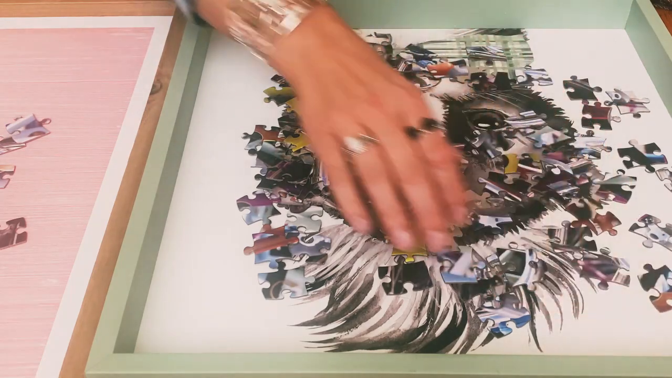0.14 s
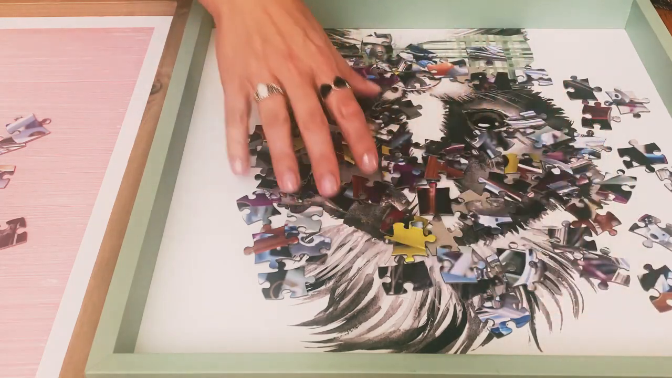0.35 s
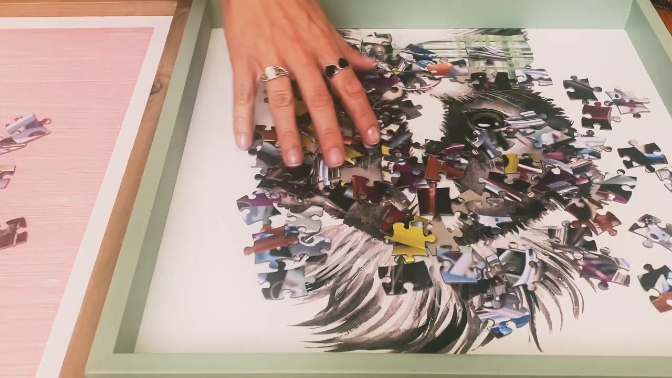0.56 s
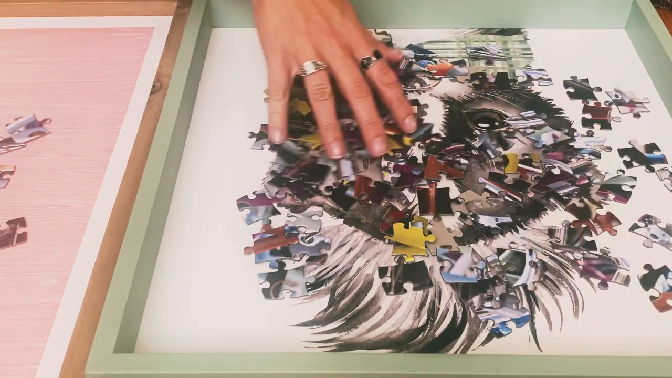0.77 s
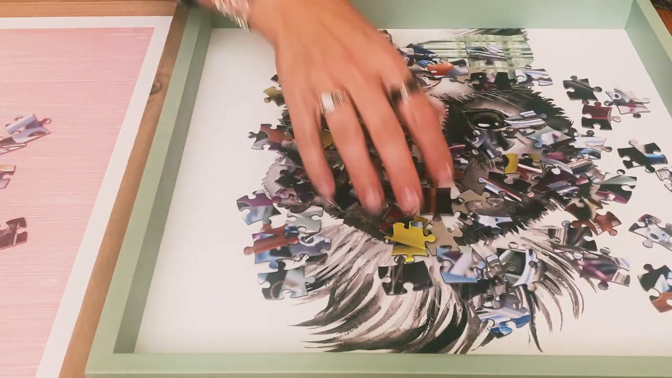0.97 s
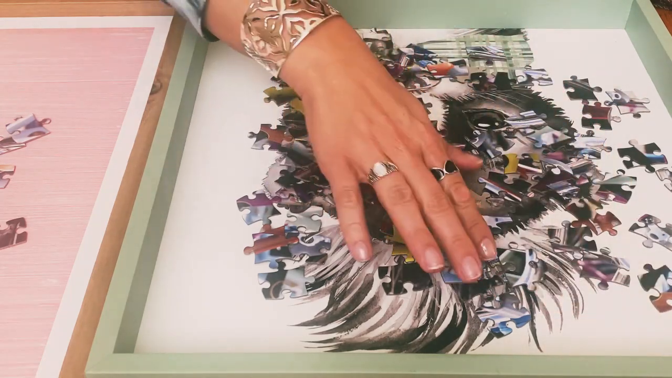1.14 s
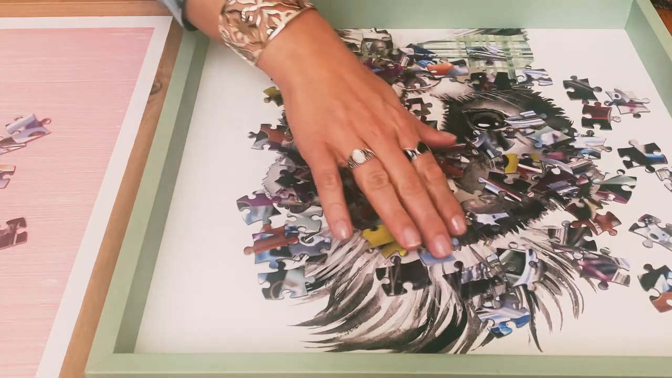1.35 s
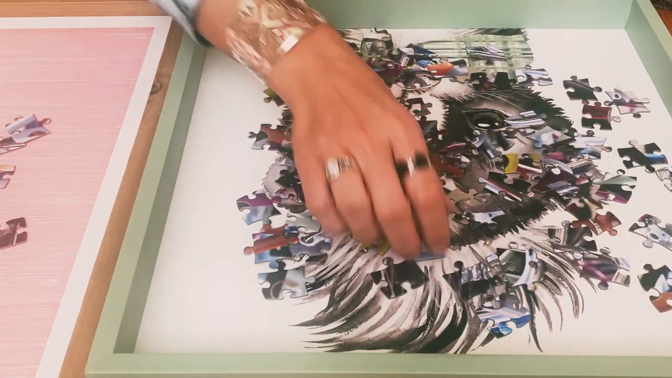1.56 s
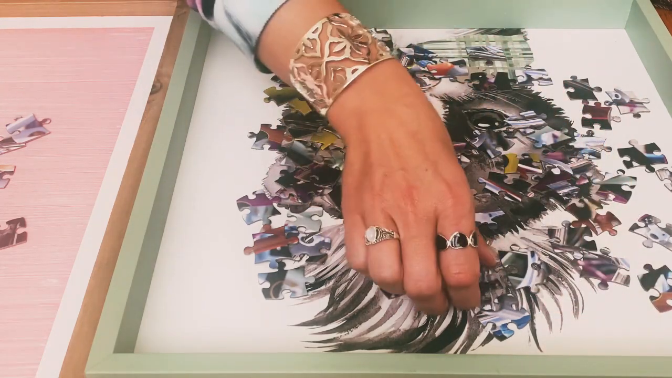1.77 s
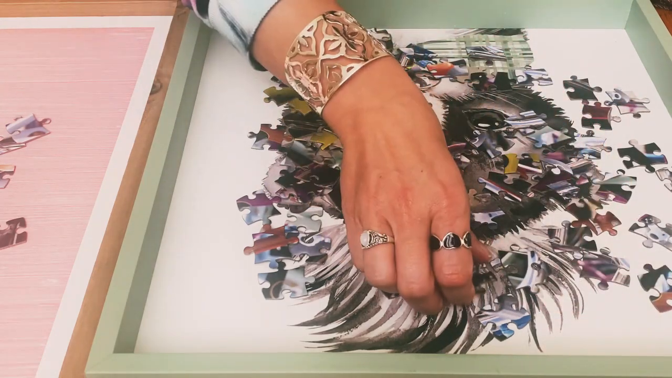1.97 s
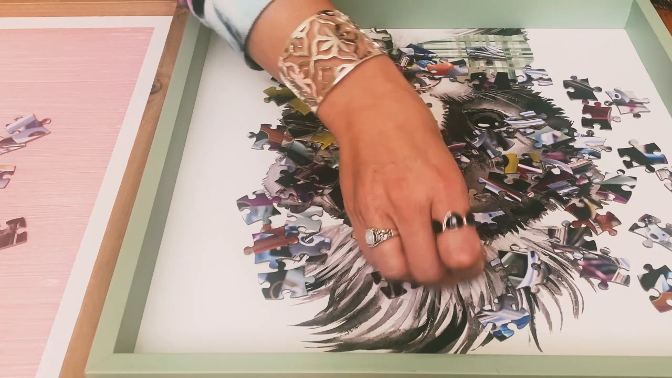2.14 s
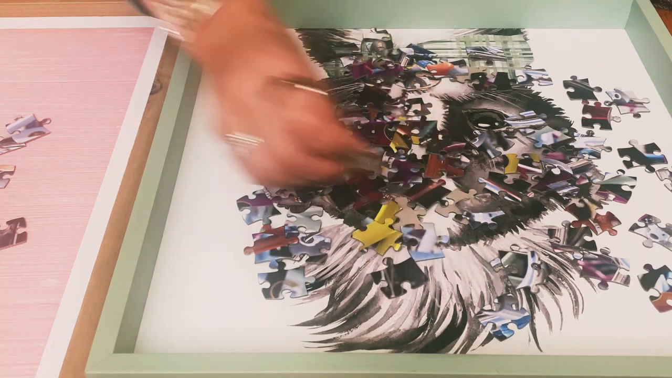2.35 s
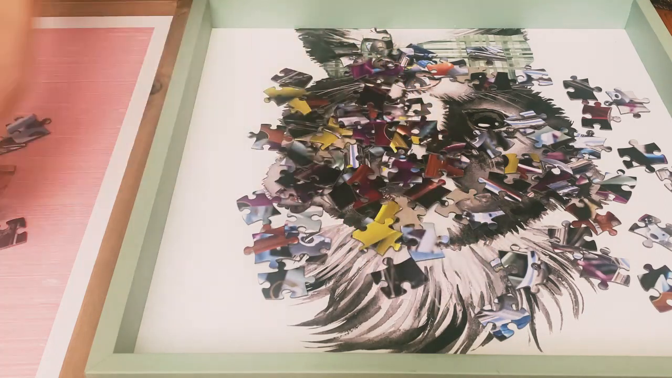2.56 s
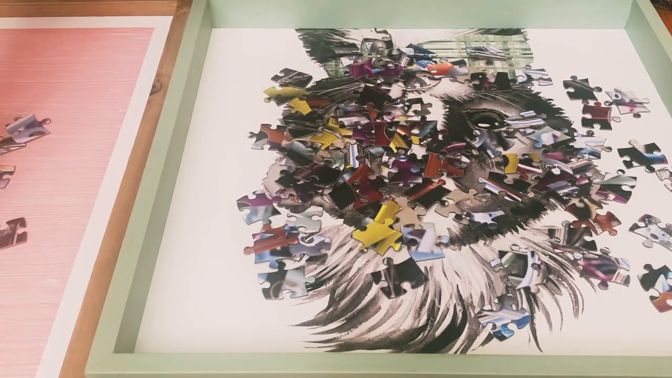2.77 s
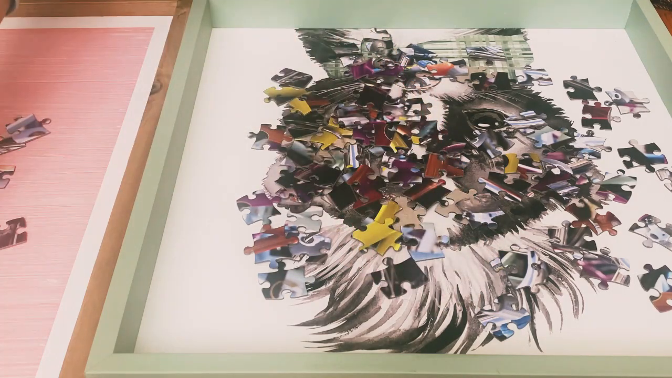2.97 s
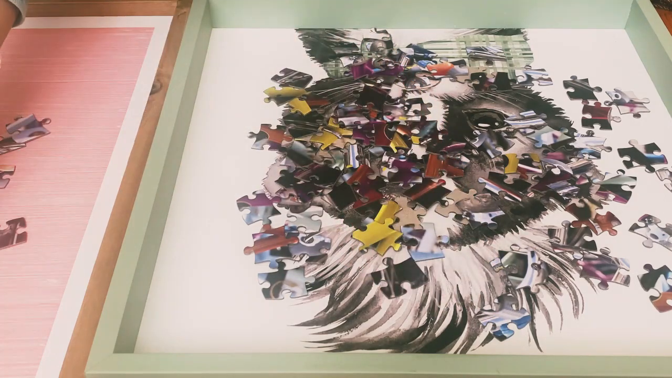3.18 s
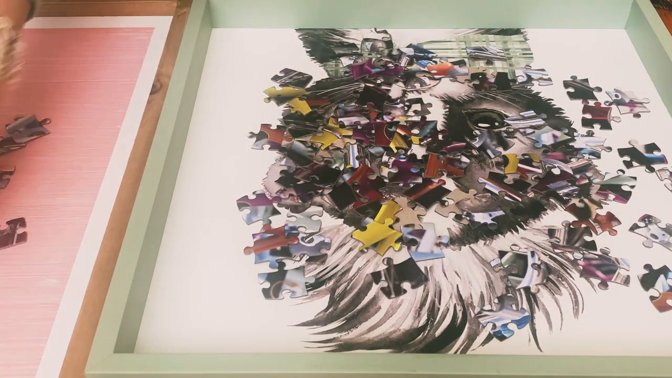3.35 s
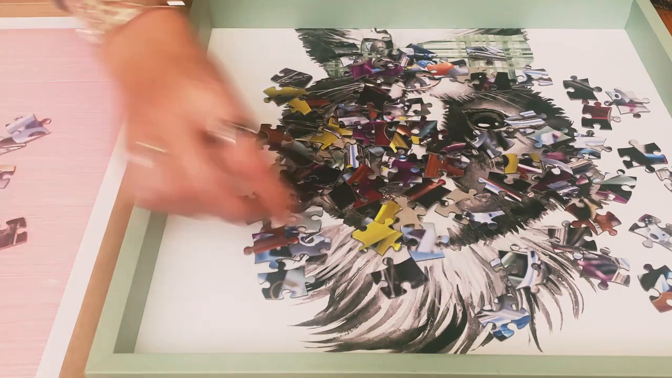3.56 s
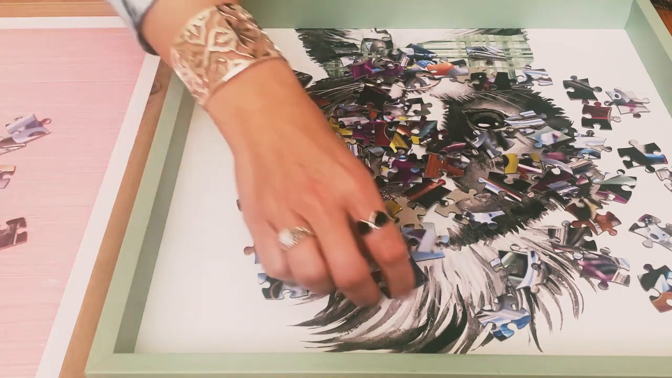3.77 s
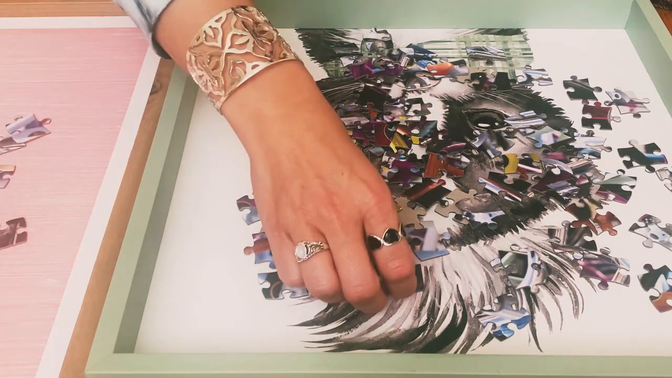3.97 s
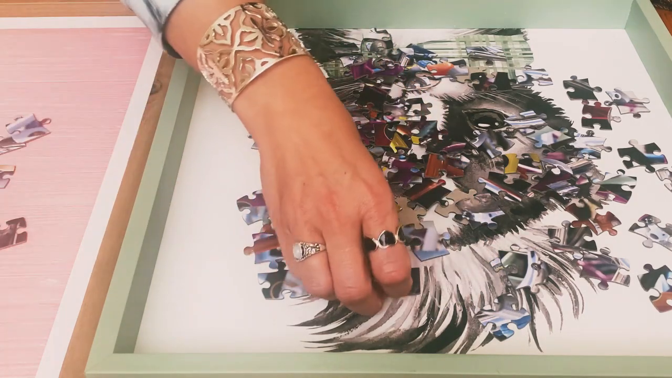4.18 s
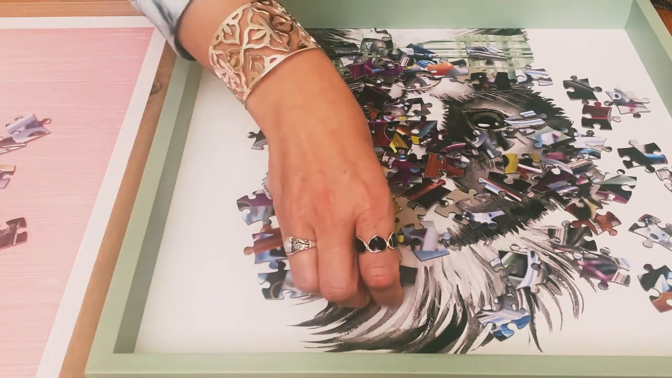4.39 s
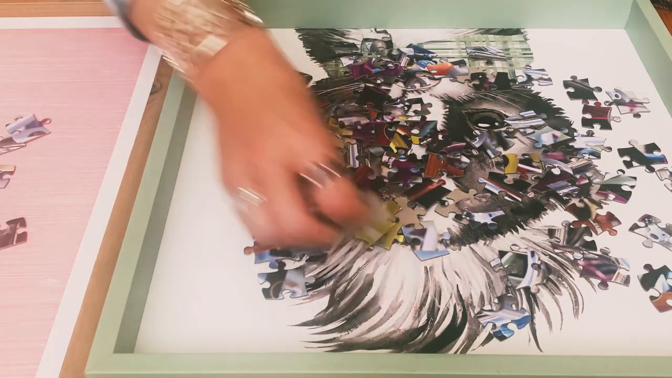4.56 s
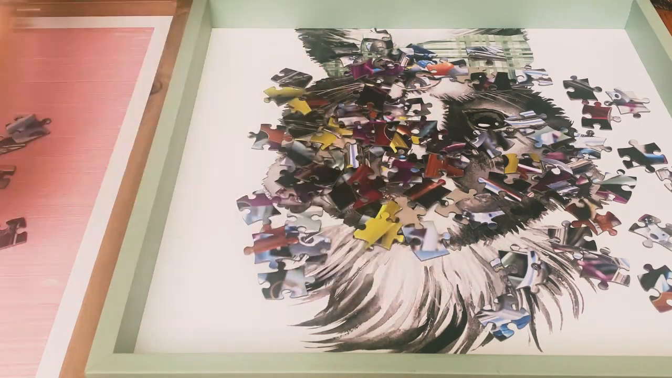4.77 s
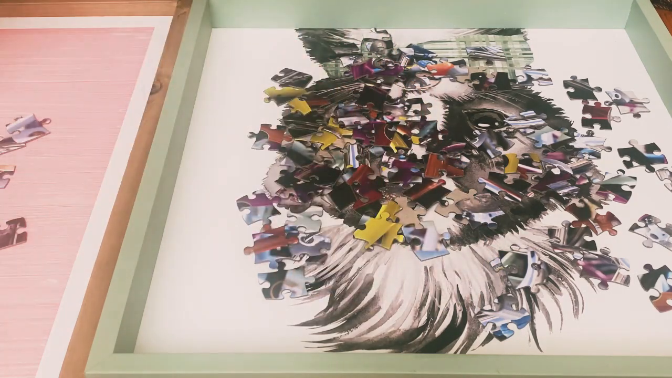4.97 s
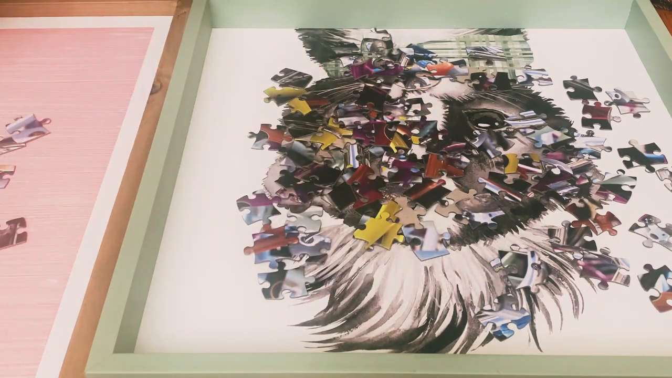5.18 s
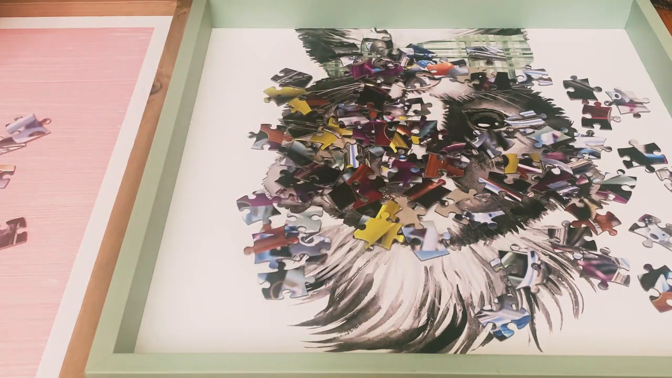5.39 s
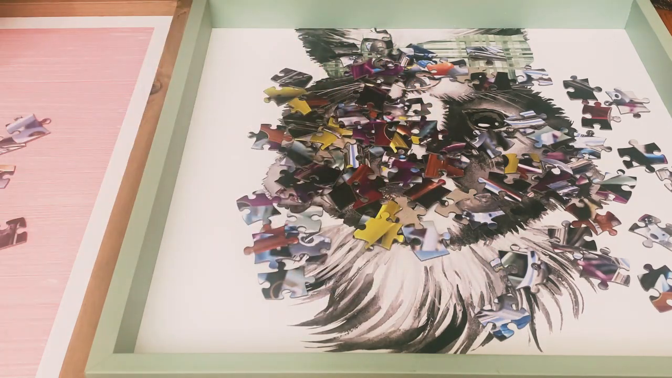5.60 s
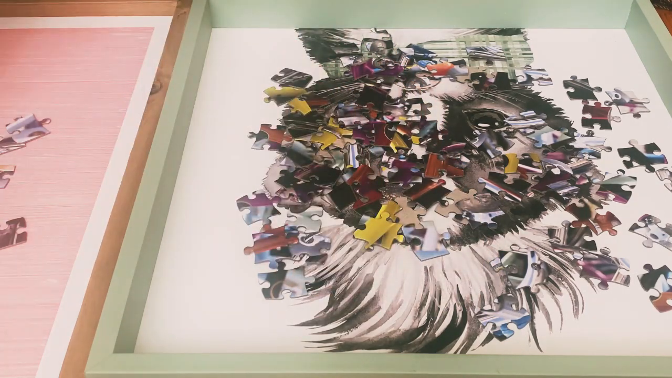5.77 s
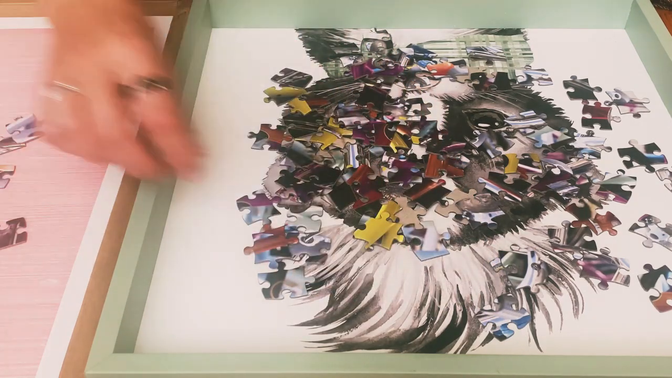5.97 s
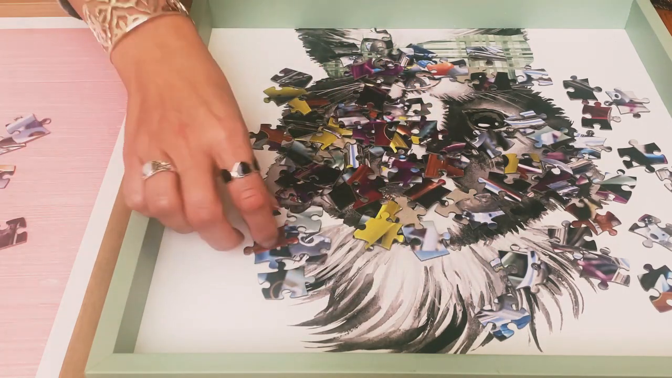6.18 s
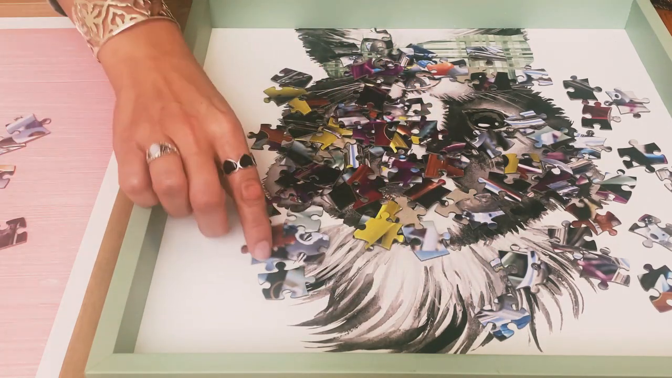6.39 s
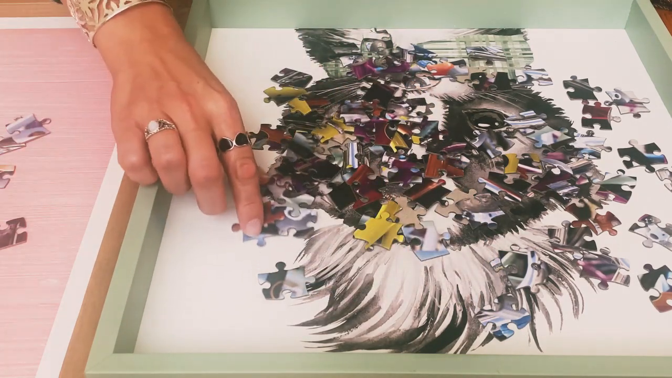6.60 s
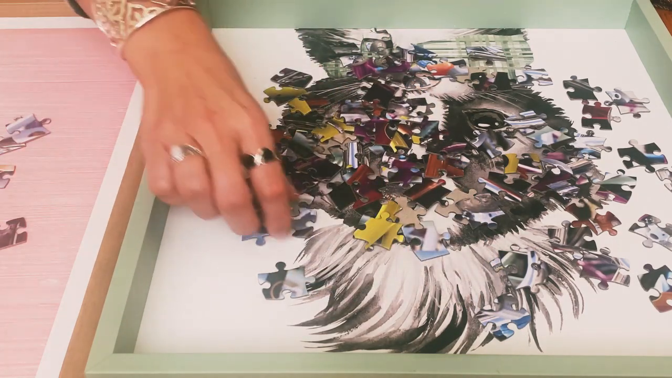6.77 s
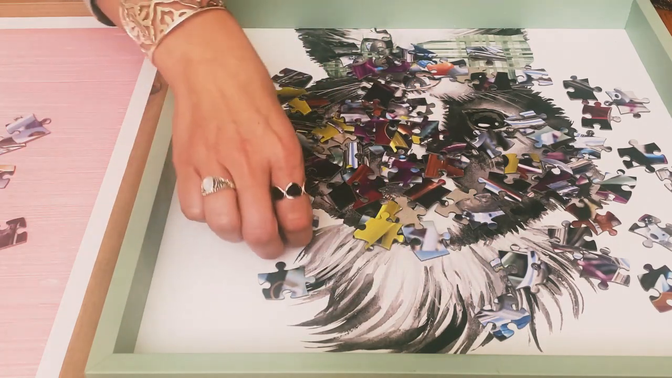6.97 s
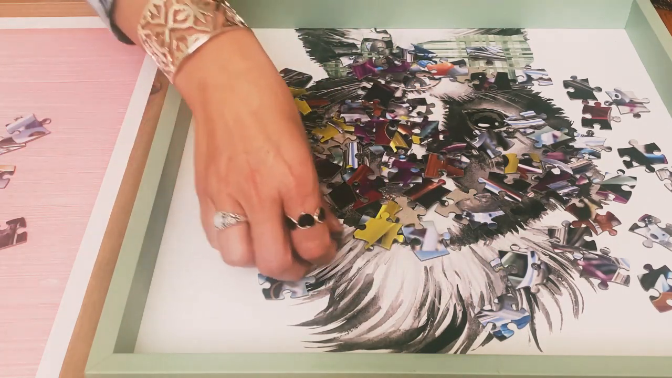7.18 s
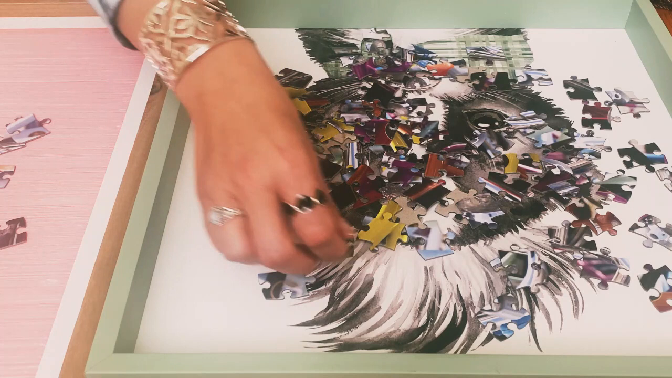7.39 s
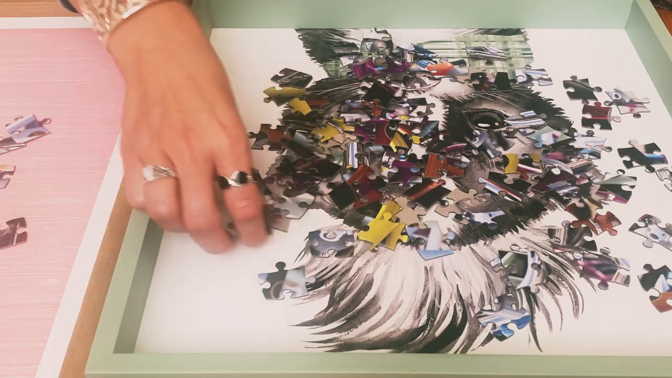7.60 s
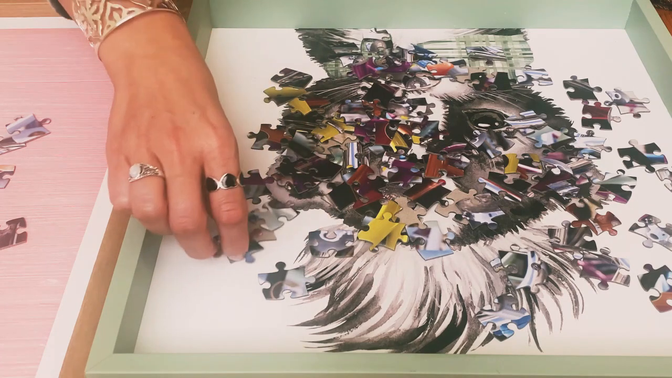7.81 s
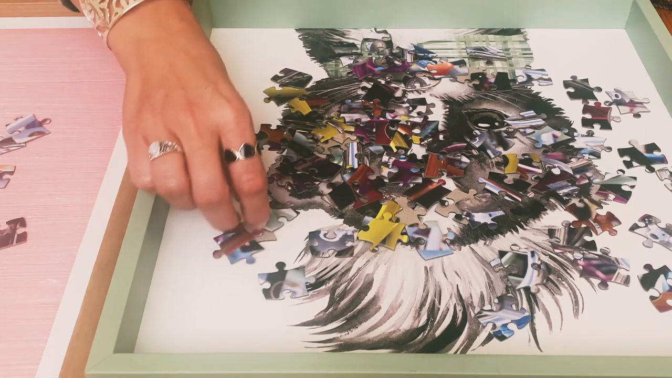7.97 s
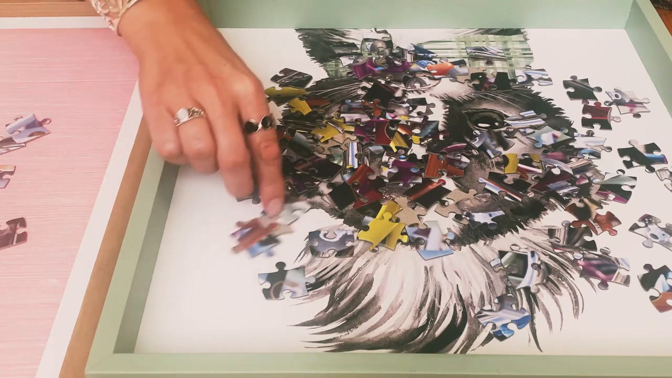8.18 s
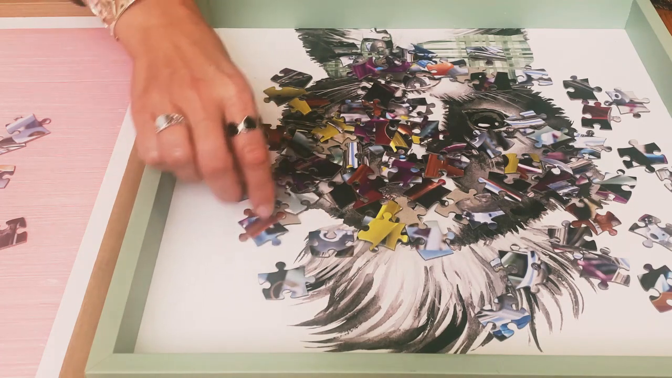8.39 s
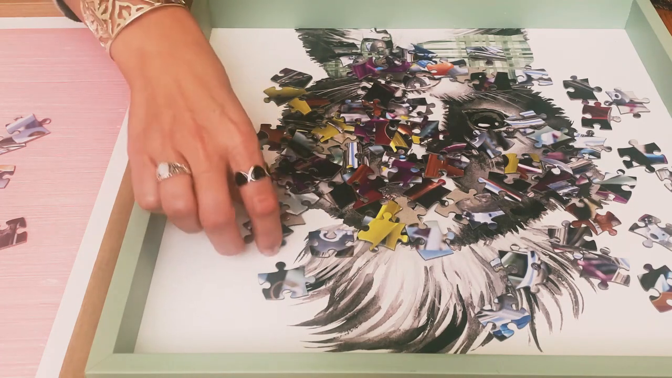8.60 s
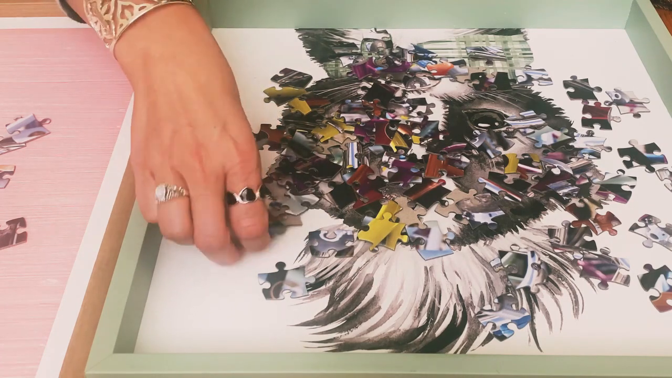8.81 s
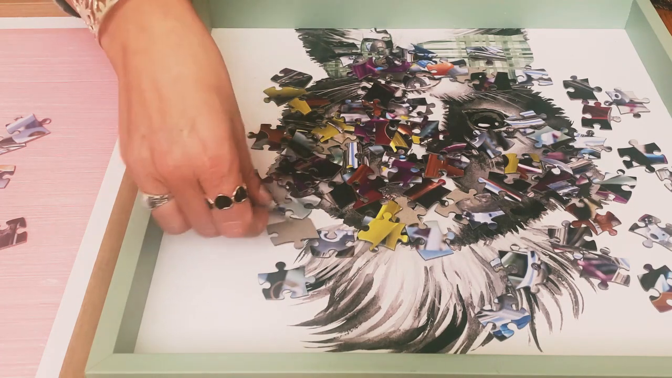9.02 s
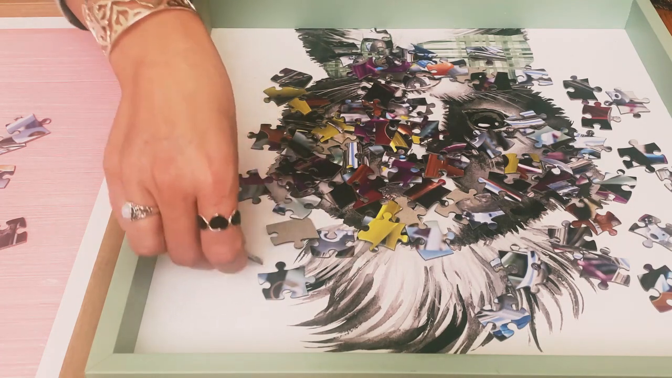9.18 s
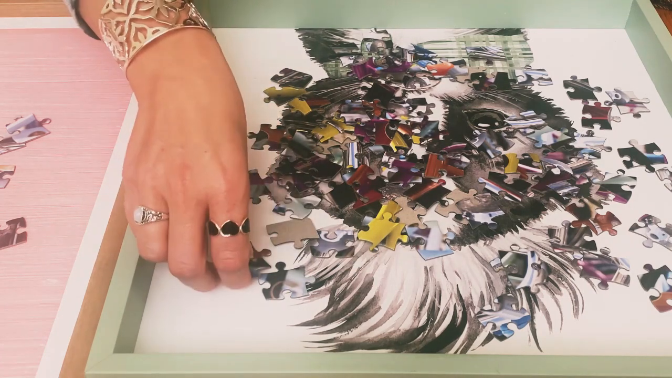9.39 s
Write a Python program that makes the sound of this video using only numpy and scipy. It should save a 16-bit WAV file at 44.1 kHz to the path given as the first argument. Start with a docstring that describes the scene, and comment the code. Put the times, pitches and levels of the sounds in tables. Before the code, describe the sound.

Loose cardboard jigsaw pieces are handled in a tray, heard closely in stereo in a small, live room with faint air, a weak steady mains hum and a deep rumble that swells and sinks. Around 0.6 s come a soft click, a papery slide and a low fingertip groan; at 1.2-1.4 s more clicks end in a firm knock, with a dull thump at 1.7 s. Faint scrapes and tiny high squeaks follow at 2.1-2.3 and 3.0 s, a tap at 3.2 s, then muted thuds and scuffs at 3.8-4.5 s. After a pause, a hollow click lands at 5.55 s. A tiny cuff tinkle at 6.2 s leads to denser rustling: a heavy soft thump at 6.85 s, the sharpest snap at 7.25 s, slides at 7.6 and 8.1 s, a hollow knock at 8.57 s. At 8.9 s a piece flips with rapid bright chatter, then a rasp at 9.2 s and a last soft tap at 9.4 s.

```python
"""Cardboard jigsaw pieces click, slide and rasp as a hand sifts them in a tray in a small, live room.
Clicks are coloured noise bursts with one resonant note; sliding is filtered noise broken into grains.
Fingertips thump the tray, a flipped piece chatters and a cuff tinkles, all as sums of damped modes.
Dragging fingertips make the board groan and edges squeak, both as band-shaped noise.
Beneath lie still air, a sinusoidal mains hum and a rumble of narrow-band noise that swells and sinks."""
import sys
import numpy as np
from scipy import signal
from scipy.fft import rfft, irfft, next_fast_len
from scipy.io import wavfile
from scipy.ndimage import uniform_filter1d

SR = 44100
rng = np.random.default_rng(int(sys.argv[2]) if len(sys.argv) > 2 else 0)


def to_wav(sig):
    """Store sig (one row per channel, or 1-D mono) as 16-bit WAV at the path in sys.argv[1].

    Samples outside -1..1 are clipped; the rate is SR.
    """
    pcm = np.clip(np.atleast_2d(sig), -1, 1) * 32767
    pcm = np.round(pcm).astype(np.int16)
    wavfile.write(sys.argv[1], SR, pcm.T)  # frames by channels


N = 416724

# level of the side signal relative to the common one, setting the stereo width: (f/Hz, level/dB)
STEREO_WIDTH = [(60, -6.5), (140, -2), (250, -2), (500, -5), (1000, -7), (2200, -8), (5000, -3.5)]
# modes of a cardboard piece: (f/Hz, level/dB, t60/s)
PIECE_MODES = [(1683, -2, 0.028), (2300, -2.5, 0.014), (2685, 4, 0.02), (3400, -0.5, 0.018),
               (7750, 6.5, 0.005)]
# rise in level from the ends of a stroke to its middle, where the hand is fastest
SCRAPE_SWELL_DB, HISS_SWELL_DB, GROAN_SWELL_DB = -0.5, 4.5, 0


def amp(db):
    """Level to amplitude: 20 dB is a factor of ten."""
    return 10 ** (np.asarray(db) / 20)


def unit(x):
    """Normalisation to an rms of 1."""
    return x / np.sqrt(np.mean(x ** 2) + 1e-20)


def along(points, hz):
    """Interpolation of (f/Hz, value) points on a logarithmic frequency axis."""
    f, values = np.transpose(points)
    return np.interp(np.log(hz + 1), np.log(f + 1), values)


def curves(rows):
    """Linear interpolation in time: one value per sample for each column after t/s."""
    knot_s, *columns = np.transpose(rows)
    return [np.interp(np.arange(N) / SR, knot_s, column) for column in columns]


def wobble(rate):
    """Random fluctuation: random knots, rate of them a second, joined by lines."""
    knots = rng.standard_normal(int(N * rate / SR) + 2)
    return np.interp(np.arange(N) * rate / SR, np.arange(len(knots)), knots)


def colour(x, points):
    """Minimum-phase filtering: the folded cepstrum of a (f/Hz, level/dB) gain gives a causal response."""
    n = x.shape[-1]
    half = next_fast_len(n // 2 + 2048)
    hz = np.fft.rfftfreq(2 * half, 1 / SR)
    cepstrum = irfft(np.log(amp(along(points, hz))))
    cepstrum[1:half] *= 2
    cepstrum[half + 1:] = 0
    response = np.exp(rfft(cepstrum))
    return irfft(rfft(x, 2 * half) * response)[..., :n]


def spread(mid, side):
    """Sum and difference stereo: an unrelated side signal lowers the coherence of left and right."""
    side = colour(side, STEREO_WIDTH)
    return np.array([mid + side, mid - side])


def noise(points):
    """Spectral shaping: stereo Gaussian noise of rms 1 with (f/Hz, level/dB) as its spectrum."""
    m = next_fast_len(N)
    hz = np.fft.rfftfreq(m, 1 / SR)
    mid_gain = amp(along(points, hz))
    side_gain = mid_gain * amp(along(STEREO_WIDTH, hz))
    spectra = rfft(rng.standard_normal((2, m))) * [mid_gain, side_gain]
    mid, side = irfft(spectra, m)[:, :N]
    return unit(np.array([mid + side, mid - side]))


def levelled(x, seconds):
    """Short-term level: the mean of both sides gets an rms of 1 over its first moments."""
    opening = x.mean(axis=0)[:int(seconds * SR)]
    return x / np.sqrt(np.mean(opening ** 2) + 1e-20)


def add(track, s, x):
    """Linear superposition of x on the track from time s."""
    start = max(round(s * SR), 0)
    part = track[:, start:start + x.shape[1]]
    part += x[:, :part.shape[1]]


def room(x, gap=0.0006, build=0.0049):
    """Diffuse reverberation: a fresh noise tail decays exponentially, at its own rate in each band."""
    # reverberation time: (f/Hz, t60/s)
    reverberation = [(100, 0.62), (260, 0.3), (950, 0.55), (4800, 0.5), (9000, 0.36), (15000, 0.093)]
    # initial spectrum of the tail: (f/Hz, level/dB)
    tail_tone = [(400, 0), (1400, -1.5), (3200, -9), (15000, -3.5)]
    hz, t, z = signal.stft(rng.standard_normal((2, SR // 2)), SR, nperseg=256)
    tone_db = along(tail_tone, hz)[:, None]
    decay = amp(tone_db - 60 * t / along(reverberation, hz)[:, None])
    tail = signal.istft(z * decay, SR, nperseg=256)[1]
    # silence for gap seconds, then a linear build-up
    tail = tail * np.clip((np.arange(tail.shape[1]) / SR - gap) / build, 0, 1)
    tail = spread(*tail) / np.sqrt(SR * 0.027)  # about the energy of the direct sound
    return signal.fftconvolve(x.mean(axis=0)[None], tail, axes=1)


def ring(modes, attack, scatter_db=2.5):
    """Modal synthesis: damped sinusoids of random strength, tuning and phase between the two sides."""
    t = np.arange(SR // 3) / SR
    hz, db, t60 = np.transpose(modes)[:, :, None]
    size, detune, skew, phase = rng.standard_normal((4, len(modes), 1))
    envelope = amp(db + scatter_db * size - 60 * t / t60) * (1 - np.exp(-t / attack))
    angle = 2 * np.pi * (hz * (1 + 0.036 * detune) * t + phase)
    turn = np.arctan(amp(along(STEREO_WIDTH, hz))) * np.sign(skew)
    return np.array([(envelope * np.sin(angle + side * turn)).sum(axis=0) for side in (1, -1)])


def resonate(x, hz, q=16, lift_db=9):
    """Resonance: a second-order peak of quality factor q lifts one narrow note out of x."""
    note = signal.lfilter(*signal.iirpeak(hz, q, SR), x)
    return x + (amp(lift_db) - 1) * note


def struck(blows, modes, attack, length, room_db, grit=0):
    """Impact excitation: blows ring the modes, with contact noise; levels refer to the first length s."""
    out = np.zeros((2, N))
    for s, db in blows:
        blow = levelled(ring(modes, attack), length)
        contact = np.exp(-np.arange(blow.shape[1]) / (length * SR))
        blow = amp(db) * (blow + grit * contact * rng.standard_normal(len(contact)))
        add(out, s, blow)
        add(out, s, amp(room_db) * room(blow))
    return out


def strokes(rows, swells_db):
    """Friction envelope: quick grip, easing, a swell with hand speed, and release, per level column."""
    attack_s, release_s = 0.045, 0.23  # times for 60 dB
    ease_db_per_s = 6.5
    t = np.arange(0, N / SR, 0.001)
    start, length, *levels = np.transpose(rows)[:, :, None]
    since = t - start
    speed = np.sin(np.pi * np.clip(since / length, 0, 1))
    before, after = np.maximum(-since, 0), np.maximum(since - length, 0)
    grip_db = -60 * (before / attack_s + after / release_s)
    grip_db = grip_db - ease_db_per_s * np.clip(since, 0, length)
    # where strokes overlap, the loudest sets the level
    loudest = [(db + grip_db + swell * (speed - 1)).max(axis=0) for db, swell in zip(levels, swells_db)]
    return curves(np.column_stack([t, *loudest]))


def patchy(x, depth_db, bins=4, frames=9):
    """Spectral modulation: each passing piece favours its own bands for a few hundredths of a second."""
    z = signal.stft(x, nperseg=512)[2]
    field = uniform_filter1d(rng.standard_normal(z.shape[1:]), bins, 0)
    field = uniform_filter1d(field, frames, 1)
    return signal.istft(z * amp(depth_db * unit(field)), nperseg=512)[1][:, :N]


def piece_ring(x, ring_db=-7):
    """Resonant response: rubbing noise convolved with the pieces' modes."""
    body = ring(PIECE_MODES, attack=0.00017, scatter_db=2)
    body = body / np.linalg.norm(body[0]) * amp(ring_db)
    return signal.fftconvolve(x.mean(axis=0)[None], body, axes=1)[:, :N]


def background(air_db=-74, rumble_db=-57):
    """Stationary sources: shaped air noise, mains harmonics, and narrow-band noise that swells and sinks."""
    # relative spectrum of still air: (f/Hz, level/dB)
    air_spectrum = [(35, -94), (70, -77.5), (130, -80), (300, -85.5), (800, -94), (5000, -101),
                    (15500, -104)]
    # mains harmonics: (f/Hz, rms level/dB)
    mains_harmonics = [(120, -82.5), (240, -78.5), (360, -82.5)]
    t = np.arange(N) / SR
    hum = sum(amp(db) * np.sin(2 * np.pi * (hz * t + rng.random())) for hz, db in mains_harmonics)
    rumble = noise([(19, -28.5), (26, -1.0), (34, -17.5), (200, -76)])
    return amp(air_db) * noise(air_spectrum) + np.sqrt(2) * hum + amp(rumble_db) * rumble


def cuff_tinkle():
    """Modal ringing: the cuff's small, high modes sound at each tinkle."""
    # tinkles: (t/s, level/dB)
    tinkles = [(6.164, -64.5), (6.178, -64)]
    # modes of the cuff: (f/Hz, level/dB, t60/s)
    cuff_modes = [(2470, -28, 0.068), (4580, -11, 0.016), (7030, -18.5, 0.018)]
    return struck(tinkles, cuff_modes, attack=0.0041, length=0.011, room_db=-2.0)


def groan():
    """Friction-driven resonance: a dragging fingertip feeds the board's low resonance near 210 Hz."""
    # drags of a fingertip: (start t/s, duration/s, level/dB)
    drags = [(.59, 0.26, -47.5), (1.2, 0.12, -45.5), (3.17, 0.024, -45), (5.32, 0.13, -48.5)]
    level_db, = strokes(drags, [GROAN_SWELL_DB])
    board = noise([(70, -18.0), (150, -13.0), (180, -17.5), (210, 4.0),
                   (250, -21.5), (600, -18.0), (1500, -54.5)])
    return amp(level_db) * board


def squeaks(room_db=-6):
    """Stick-slip friction: uneven slips of a piece's edge, as noise crowded around one pitch."""
    # squeaks: (start t/s, duration/s, pitch f/Hz, level/dB)
    slips = [(2.228, .02, 4700, -67), (2.307, 0.033, 5220, -61.5), (3.01, 0.073, 6470, -62),
             (6.149, 0.051, 2510, -65)]
    flank = 1.2  # frequency ratio from the pitch to the skirt
    skirt_db, swell_db = -24.5, 6  # gain at the skirt; rise towards mid-stroke
    out = np.zeros((2, N))
    for start, length, hz, db in slips:
        level_db, = strokes([(start, length, db)], [swell_db])
        band = [(hz / 10, 2 * skirt_db), (hz / flank, skirt_db), (hz, 0),
                (hz * flank, skirt_db), (hz * 10, 2 * skirt_db)]
        out += amp(level_db) * noise(band)
    return out + amp(room_db) * room(out)[:, :N]


def piece_chatter():
    """Repeated impact: a flipped piece rings its modes at each blow as it settles."""
    # blows: (t/s, level/dB)
    settling_blows = [(8.8762, -29), (8.8915, -26), (8.8985, -30), (8.9155, -30), (8.9355, -48)]
    return struck(settling_blows, PIECE_MODES, attack=0.000074, length=0.0052, room_db=-3, grit=0.56)


def tray_thumps():
    """Soft impact: fingertips excite the low modes of the tray's base with a slow attack."""
    # landings of fingertips: (t/s, level/dB before the stereo balance)
    landings = [(0.658, -49.5), (1.355, -45.5), (1.72, -38.5), (3.847, -39), (4.037, -41), (5.555, -49.5),
                (6.185, -62), (6.332, -48), (6.849, -32.5), (7.253, -43), (8.124, -50.5), (8.57, -31.5),
                (8.895, -48), (9.164, -59), (9.376, -43.5)]
    # modes of the tray: (f/Hz, level/dB, t60/s)
    tray_modes = [(92, -15.5, 0.31), (117, -13, 0.2), (154.8, -13.5, 0.25), (219, 2, 0.11),
                  (270, -2.5, 0.063), (306, -9.5, 0.14), (381, -13, 0.085)]
    thumps = struck(landings, tray_modes, attack=0.013, length=0.063, room_db=-8.0)
    balance_db = [[1.2], [-1.2]]  # left, right
    return thumps * amp(balance_db)


def sliding(grain_db=2.5, catch_db=2.2, room_db=-7, snag_rate=170, snag=1.5, snag_life=0.001):
    """Granular friction: fibres catch and slip, scraping the bodies, hissing on faces, rasping at edges."""
    # pieces pushed over each other and the base, before the stereo balance:
    # (start t/s, duration/s, scrape level/dB, hiss level/dB)
    pushes = [(.579, .085, -49.5, -54.5), (.685, 0.13, -46.5, -44), (1.199, 0.16, -48, -47),
              (1.722, 0.093, -51, -51), (2.135, 0.02, -50, -53), (2.085, .045, -66, -72.5),
              (2.87, 0.0513, -59, -68), (3.03, 0.06, -59, -75.5), (3.149, 0.012, -48.5, -49),
              (3.815, 0.16, -54.5, -60), (4.024, 0.053, -52.5, -85), (4.423, 0.06, -53.5, -55),
              (5.228, 0.033, -65, -68), (5.3, 0.12, -57.5, -82.5), (5.533, 0.029, -47, -57),
              (6.315, 0.29, -56, -47.5), (6.845, 0.069, -44, -55), (7.015, 0.072, -58, -59.5),
              (7.08, 0.23, -47.5, -55), (7.598, 0.21, -50.5, -46.5), (8.118, 0.16, -50.5, -53.5),
              (8.57, .075, -46.5, -57), (8.805, 0.1, -58.5, -52), (8.878, 0.059, -39.5, -39.5),
              (9.163, .088, -46, -48)]
    # a cut edge drawn across other pieces, before the stereo balance: (start t/s, duration/s, level/dB)
    edge_strokes = [(8.125, 0.15, -52), (8.88, 0.044, -43), (9.17, 0.082, -43)]
    # relative spectra of bodies, faces and edges: (f/Hz, level/dB)
    scrape_spectrum = [(70, -24.5), (130, 6), (260, -2), (450, -5.5), (950, -1.5), (1250, 1.5), (1680, 1),
                       (2200, -7), (2750, -10.5), (4000, -14), (6000, -17.5), (12000, -29)]
    hiss_spectrum = [(1200, -17.5), (1750, -5), (2700, -6.5), (3700, 2), (5300, -3.5), (8500, 1.5),
                     (11000, -4.5), (15500, -9.5)]
    rasp_spectrum = [(900, -27), (1700, 1.5), (2200, -13), (2750, 5.5), (3150, -3), (3900, -3.5),
                     (12000, -27.5)]

    scrape_db, hiss_db = strokes(pushes, [SCRAPE_SWELL_DB, HISS_SWELL_DB])
    rasp_db, = strokes(edge_strokes, [HISS_SWELL_DB])
    # fibres and tabs snag about 170 times a second: tiny ticks of random size
    snags = (rng.random(N) < snag_rate / SR) * rng.random(N) * 2 * snag
    ticks = signal.lfilter([1], [1, -np.exp(-1 / (snag_life * SR))], snags)
    catching = amp(catch_db * wobble(70) + grain_db * wobble(900)) + ticks
    scrape = amp(scrape_db) * unit(catching * patchy(noise(scrape_spectrum), depth_db=3))
    hiss = amp(hiss_db) * unit(catching * patchy(noise(hiss_spectrum), depth_db=3.8))
    rasp = amp(rasp_db) * unit(catching * noise(rasp_spectrum))
    balance_db = [[-0.6], [0.6]]  # left, right
    rustle = (scrape + hiss + rasp + piece_ring(hiss)) * amp(balance_db)
    return rustle + amp(room_db) * room(rustle)[:, :N]


def clicks(t60=0.035, snap=2.97, snap_t60=0.012, rise=0.003, board_level_db=-1.0, card_db=3):
    """Heavily damped impact: stiff card gives a snap and a few milliseconds of dense ringing."""
    # a piece is tapped, snaps over its neighbour or drops: (t/s, level/dB before the stereo balance,
    # hollow tone level/dB relative to the board level, bright edge level/dB, ringing note f/Hz)
    impacts = [(0.6573, -41.5, 4.5, 1.5, 6600), (1.1953, -47, 0, -0.5, 1680), (1.211, -41, 3, -2.5, 1680),
               (1.331, -46, -11, 13, 4730), (1.3511, -30, 1.5, -13.5, 950), (1.7136, -38.5, 7.5, -8, 2300),
               (2.1566, -52, 9, -22, 944), (2.168, -51.5, 1, 15.5, 3600), (2.8654, -53.5, 29, 9.5, 553),
               (3.168, -37.5, 9.5, -35, 1393), (3.841, -42.5, 5, -12.5, 3400), (4.025, -51.5, -9, -1, 2920),
               (4.042, -44.5, 11, -25, 1730), (4.224, -57, -1, -44, 1950), (4.4834, -43.5, -10, 6.5, 3750),
               (5.5481, -34.5, 5, -21.5, 808), (6.3165, -40.5, 11.5, -10, 740), (6.3199, -42, 6, 1, 4550),
               (6.841, -37, 7.5, -12, 1660), (7.082, -46, 0.5, 5.5, 4860), (7.1703, -45, 13, -6, 1660),
               (7.2499, -24.5, -2.5, -17, 2190), (7.579, -43, 3, -13, 3400), (7.6256, -36.5, 7.5, 0, 1574),
               (8.2631, -45.5, -10, 11, 7000), (8.5664, -30, 12, -13.5, 2700), (9.3721, -45, 6, -15, 900)]
    # the more the board below takes part in a click, the more the room answers
    click_room_db, room_per_hollow = -1, 0.24
    balance_db = [[-1.0], [1.0]]  # left, right
    lead = SR // 100  # samples ahead of the contact
    out, t = np.zeros((2, N)), np.arange(-lead, SR // 12) / SR
    for s, db, hollow_db, edge_db, note_hz in impacts:
        # the onset swells briefly, longer for a bright click than for a dull one
        swell = np.exp(np.minimum(t, 0) / (rise * amp(edge_db / 2)))
        envelope = amp(-60 * np.abs(t) / t60) * swell * np.where(t < 0, 0.5, 1)
        burst = rng.standard_normal((2, len(t))) * envelope
        # the snap lifts the common signal, less so for a bright edge
        snap_decay = (t >= 0) * amp(-60 * np.abs(t) / snap_t60)
        burst[0] *= 1 + snap * snap_decay / (1 + 2 * amp(edge_db))
        # a broad hollow plateau from the board below, the card's own middle band, and the edge's treble
        board_db = hollow_db + board_level_db
        tone = [(100, board_db - 14.5), (500, board_db - 1.5), (900, board_db), (1500, card_db),
                (2200, card_db), (3900, card_db + edge_db / 5), (7500, edge_db), (15000, edge_db - 11.5)]
        ringing = resonate(colour(burst, tone), note_hz)
        click = amp(db) * levelled(spread(*ringing), 0.01153)
        add(out, s - lead / SR, click * amp(balance_db))
        # the room hears the piece from all sides, so its answer keeps only the broad colour and the note
        radiated = resonate(colour(np.where(t == 0, 1.0, 0.0), tone), note_hz)
        radiated = radiated * np.linalg.norm(click.mean(axis=0)) / np.linalg.norm(radiated)
        room_db = click_room_db + room_per_hollow * hollow_db
        add(out, s - lead / SR, amp(room_db) * room(radiated[None]))
    return out


def scene():
    """Superposition of the pieces, the tray and the cuff over the room's background."""
    impacts = clicks() + tray_thumps() + piece_chatter() + cuff_tinkle()
    friction = sliding() + squeaks() + groan()
    return impacts + friction + background()


def record(dry):
    """Band limiting: the recorder keeps nothing from its upper limit upwards."""
    top_hz = 16050
    m = next_fast_len(N + SR // 2)
    passed = np.fft.rfftfreq(m, 1 / SR) < top_hz
    return irfft(rfft(dry, m) * passed, m)[:, :N]


dry = scene()
out = record(dry)
to_wav(out)
```